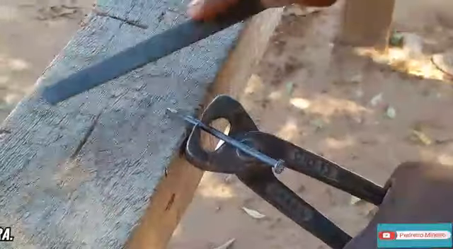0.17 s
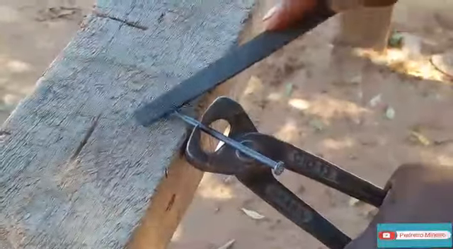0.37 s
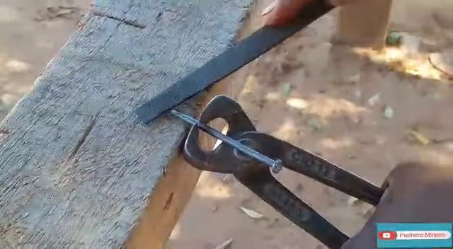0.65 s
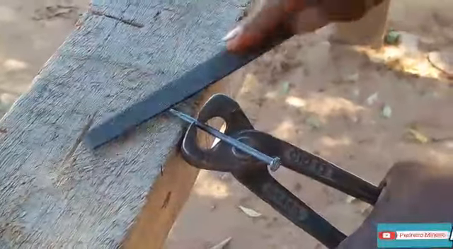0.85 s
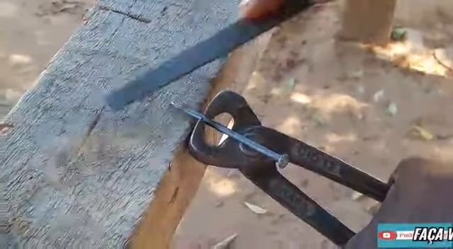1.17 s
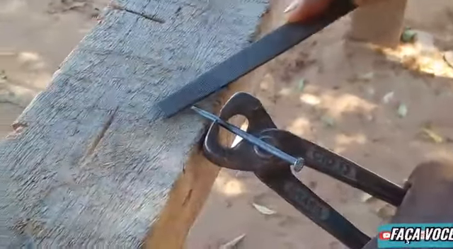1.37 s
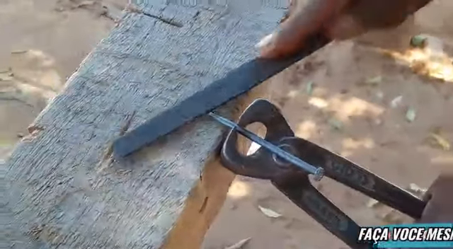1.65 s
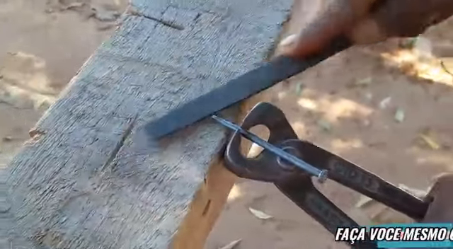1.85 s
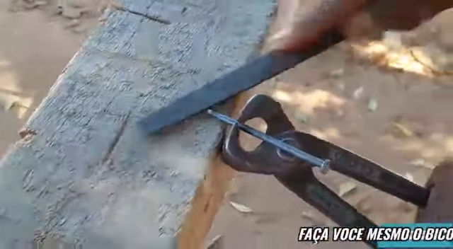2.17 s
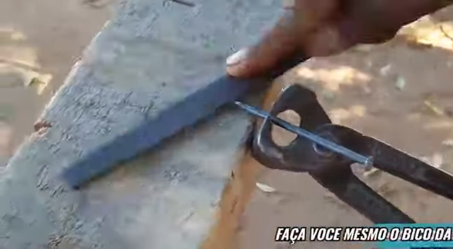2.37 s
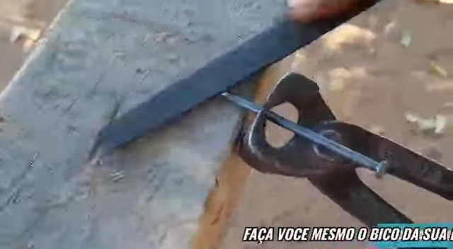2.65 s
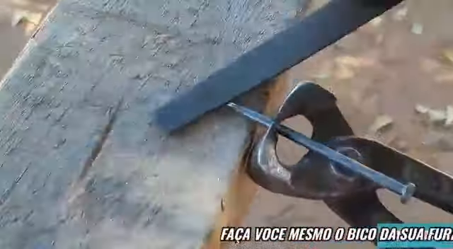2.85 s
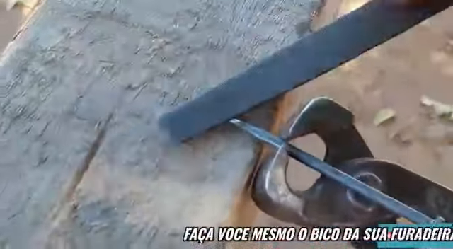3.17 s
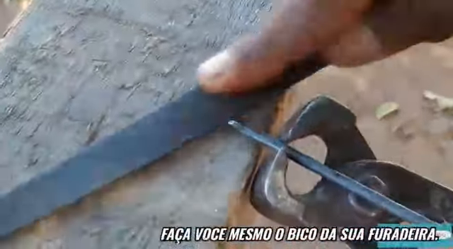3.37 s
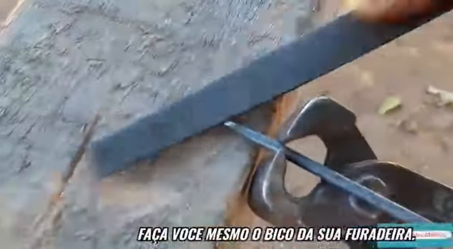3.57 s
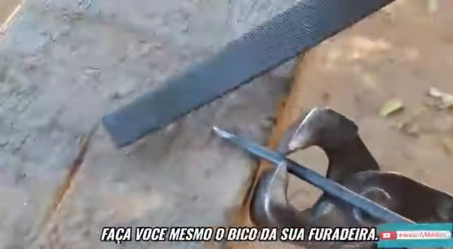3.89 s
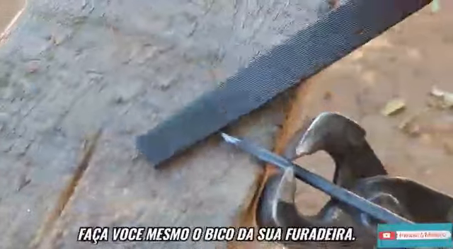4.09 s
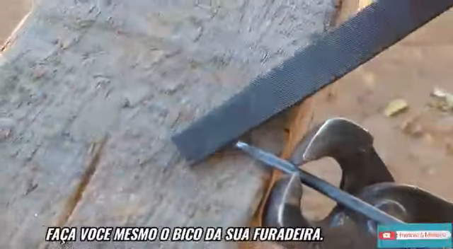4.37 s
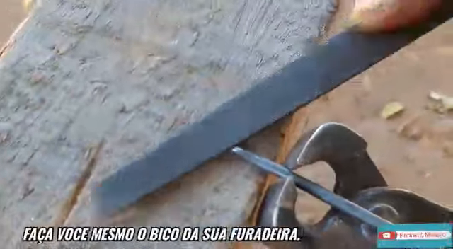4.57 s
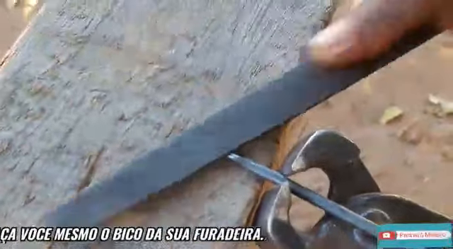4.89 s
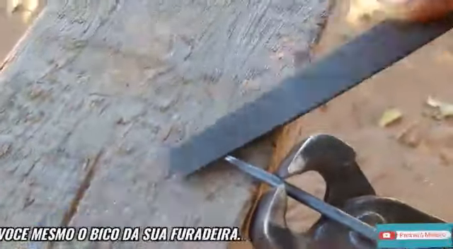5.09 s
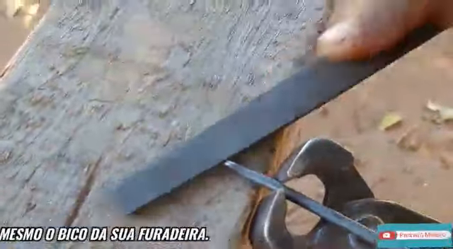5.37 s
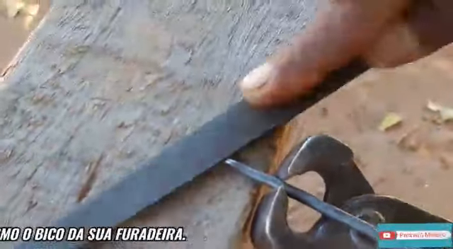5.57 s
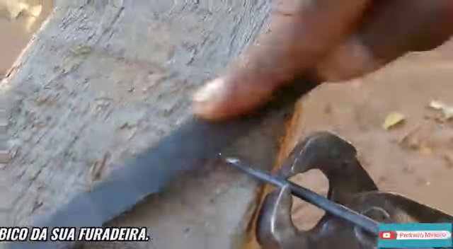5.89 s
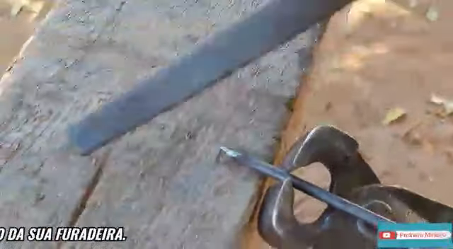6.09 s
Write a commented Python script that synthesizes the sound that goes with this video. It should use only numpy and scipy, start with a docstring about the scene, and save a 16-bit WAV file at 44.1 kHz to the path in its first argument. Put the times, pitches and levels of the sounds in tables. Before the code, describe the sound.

Outdoors, a flat steel file rasps to and fro over a nail tip gripped in pincers, in two quick runs of strokes with small taps between.

```python
"""Filing a nail at a plank

Outdoors, a flat hand file rasps to and fro over the tip of a nail held in pincers against a plank. In each
stroke the teeth pluck the nail faster, then slower, and ring pincers, blade and nail. Between the runs of
strokes come small taps, light hissing drags and low knocks of pincers on wood. Short and long echoes and a
faint outdoor murmur lie around the work; the microphone cuts a deep notch into the treble."""
import sys
import numpy as np
from scipy import signal
from scipy.fft import rfft, irfft, next_fast_len
from scipy.io import wavfile
from scipy.ndimage import map_coordinates

SR = 44100
rng = np.random.default_rng(int(sys.argv[2]) if len(sys.argv) > 2 else 0)


def pcm_store(signal):
    """Save signal as 16-bit PCM."""
    levels = np.round(np.clip(np.atleast_2d(signal), -1, 1) * 32767)
    wavfile.write(sys.argv[1], SR, levels.astype(np.int16).T)


N = 274561

# Strokes of the file, heavy and light mostly in turn: start t/s, length t/s, relative nail level/dB,
# weight (pincers over nail) level/dB, catch of the teeth after the start t/s
STROKES = [(0.08, 0.18, -36, 1.57, 0.032), (0.877, 0.15, -34.5, 1.47, 0.053),
           (1.059, 0.17, -33.5, 4.5, 0.049), (1.21, 0.17, -32, -2.5, 0.031),
           (1.392, 0.18, -31.5, 1.56, 0.051), (1.551, 0.166, -30, -4.5, 0.039),
           (1.712, 0.18, -30.5, -0.0, 0.046), (1.881, 0.16, -30.5, -5.5, 0.038),
           (2.037, 0.19, -29.5, 1.46, 0.064), (2.2, 0.17, -28.5, -5, 0.034), (2.374, 0.15, -26, -1.5, 0.05),
           (2.516, 0.171, -28.5, -6, 0.035), (2.68, 0.17, -26.5, -0.46, 0.026),
           (2.834, 0.16, -28.5, -8.5, 0.053), (3.813, 0.18, -34.5, -0.2, 0.06),
           (3.977, 0.18, -31, -1.73, 0.046), (4.148, 0.15, -29.5, -6.5, 0.018),
           (4.294, 0.18, -28, 3.5, 0.039), (4.453, 0.15, -28, -7.5, 0.038),
           (4.598, 0.18, -28.5, 3.5, 0.042), (4.757, 0.16, -28.5, -6, 0.032),
           (4.914, 0.15, -26.5, 3.5, 0.042), (5.058, 0.18, -28, -6.5, 0.031),
           (5.986, 0.16, -38, -4.5, 0.03)]
# Resonances of the pincers: nominal f/Hz, width f/Hz, level/dB in the first grip, level/dB once settled
PINCERS = [(563.2, 15, -19, -2), (648, 71, -3, -6.5), (770, 133, -14, -9), (861, 46, -4, -17.5),
           (951, 41.7, -5, -3.5), (1056.6, 57, -8, -1.5), (1234, 49, -9, -7.5), (1392, 56, -4.5, -6),
           (1525, 92, -14.5, -4.5)]


def amp(db):
    """Amplitude factor of a level in dB."""
    return 10 ** (np.asarray(db) / 20)


def rms(x):
    """Effective value of a signal."""
    return np.sqrt(np.mean(x ** 2))


def unit(x):
    """The signal at an effective value of one."""
    return x / np.sqrt(np.mean(x ** 2) + 1e-20)


def along(points, hz):
    """Value at hz on a curve of (Hz, value) points over a log axis."""
    f, value = np.transpose(points)
    return np.interp(np.log(hz + 1), np.log(f + 1), value)


def wobble(rate, size):
    """A smooth random curve with rate knots a second."""
    return map_coordinates(rng.standard_normal(4096), [np.arange(size) * rate / SR], mode="mirror")


def filtered(x, response):
    """The signal passed through a complex response of frequency."""
    n = x.shape[-1]
    m = next_fast_len(n + 4096)
    spectrum = rfft(x, m) * response(np.fft.rfftfreq(m, 1 / SR))
    return irfft(spectrum, m)[..., :n]


def add(track, s, x):
    """Mix x into the track from s seconds on."""
    start = max(round(s * SR), 0)
    track[..., start:start + x.shape[-1]] += x[..., :N - start]


def yard(floor_db=-65.5):
    """Faint outdoor air, mostly a low murmur of wind and distance: shaped noise that slowly swells."""
    # spectrum of the air: f/Hz, relative level/dB per Hz
    air = [(25, -9), (50, -9.5), (90, -1), (130, -6), (230, -4), (420, -14), (700, -11.5), (1100, -15.5),
           (4000, -21.5), (5200, -21), (6500, -35.5), (15000, -36)]
    # left-right likeness: f/Hz, correlation (1 = alike)
    likeness = [(30, 0.34), (200, 1), (4000, 0.3), (10000, .5)]

    def mid_and_side(f):
        turn = np.arccos(np.clip(along(likeness, f), -1, 1)) / 2
        return amp(along(air, f)) * [np.cos(turn), np.sin(turn)]

    mid, side = filtered(rng.standard_normal((2, N)), mid_and_side)
    return unit(np.array([mid + side, mid - side])) * amp(floor_db + 2.4 * wobble(3.3, N))


def echo(x, decay):
    """Things around scatter a noise tail, different at each ear, that fades at its own pace per pitch."""
    hz, t, z = signal.stft(rng.standard_normal((2, SR)), SR, nperseg=256)
    fade = amp(-60 * t / along(decay, hz)[:, None])
    tail = signal.istft(z * fade, SR, nperseg=256)[1]
    return signal.fftconvolve(x.mean(0)[None], tail / np.linalg.norm(tail[0]), axes=1)[:, :N]


def plank(force):
    """The pincers rattle loosely on the wood, which answers dully and without pitch."""
    # answer of the wood: f/Hz, relative level/dB per Hz
    wood = [(40, -34), (90, -20), (160, -2), (240, -1), (400, 1), (700, -7.5), (1500, -72), (3000, -28),
            (6000, -27.5), (15000, -54.5)]
    rattle = force * rng.standard_normal(len(force))
    return unit(filtered(rattle, lambda f: amp(along(wood, f)))) * rms(force)


def bumps(t60=0.049, soft_hz=380, lowest_hz=110):
    """The pincers knock on the plank: a soft contact, so only a low thud."""
    # knocks: t/s, relative level/dB
    knocks = [(0.409, -46), (0.694, -54), (1.503, -35.5), (2.985, -39.5), (5.19, -33.5)]
    force, t = np.zeros(N), np.arange(SR // 8) / SR
    for s, db in knocks:
        add(force, s, amp(db - 60 * t / t60))

    def thud_band(f):
        return (1j * f / (lowest_hz + 1j * f) / (1 + 1j * f / soft_hz)) ** 2

    return 2 * filtered(plank(force), thud_band)


def settling(s):
    """How far the grip has settled at time s, as a share from 0 to 1."""
    # grip on the pincers: t/s, share of the settled grip
    grip = [(1.2, 0), (2.5, 0.8)]
    return np.interp(s, *np.transpose(grip))


def ring(force, modes, s, vary_db=2, detune=0.0067):
    """The force rings a part, at equal energy; every contact spot weighs and tunes the modes anew."""
    settled = settling(s)
    hz, width, first_db, settled_db = np.transpose(modes)[:, :, None]
    grip_db = first_db + settled * (settled_db - first_db)
    gain = amp(grip_db + vary_db * rng.standard_normal(hz.shape))
    hz = hz * (1 + detune * rng.standard_normal(hz.shape))
    sign = (-1) ** np.arange(len(modes))[:, None]

    def resonances(f):
        each = sign * gain * 1j * f * width / (hz * hz - f * f + 1j * f * width)
        return np.sum(each, axis=0)

    return unit(filtered(force, resonances)) * rms(force)


def grit(size, clump_db, clump_rate):
    """Tiny steel chips tear off in clumps: noise with a random level."""
    return unit(rng.standard_normal(size) * amp(clump_db * wobble(clump_rate, size)))


def steel(force, s, pincers_db, blade_db, nail_db, sizzle_db=-18, plank_db=-17, spread=0.37):
    """All the parts answer one contact force; only the highest sizzle differs left and right."""
    # resonances of blade, nail and sizzle:
    # nominal f/Hz, width f/Hz, level/dB in the first grip, level/dB once settled
    blade_modes = [(1771, 45, -2.5, -2), (2085, 146, -5, -7), (2341, 190, -5.5, 0), (2578, 71, -1, 1.5),
                   (2751, 68, -1.5, 0.5), (3096, 62, 4, -2), (3448, 176, -5, -2), (3874, 200, -8.5, 2)]
    nail_modes = [(4570, 160, -6, -10), (4828, 175, 1, -7), (4739, 280, 0, -4.5), (5362, 152, -5, 4),
                  (5655, 93, -9, -1.5), (6370, 210, -22.5, -21), (6737, 72, -16, -11.5)]
    sizzle_modes = [(8560, 52, -9.5, 1), (9510, 110, 8.5, -9), (10020, 84, -0.5, -7), (10800, 94, 0.5, 6),
                    (11800, 70, -0.5, -7.5), (11880, 200, -7.5, 7), (13000, 72, 5.5, -2),
                    (12300, 44, -2.5, 3.5), (13700, 65, 1.5, -25), (14300, 44, -6.5, 2),
                    (14750, 120, -18, -1)]
    body = amp(pincers_db) * ring(force, PINCERS, s)
    body = body + amp(blade_db) * ring(force, blade_modes, s)
    body = body + amp(nail_db) * ring(force, nail_modes, s)
    body = body + amp((pincers_db + blade_db) / 2 + plank_db) * plank(force)
    mid = ring(force, sizzle_modes, s, vary_db=6.0, detune=0.011)
    rough = force * rng.standard_normal(len(force))
    side = spread * ring(rough, sizzle_modes, s, vary_db=6.0, detune=0.012)
    # the sizzle grows as the first strokes cut into fresh steel
    fresh_db = np.interp(s, [0, 1.5], [-8, 0])
    return body + amp(nail_db + sizzle_db + fresh_db) * np.array([mid + side, mid - side])


def contact(length, attack_s=0.02, release_s=0.028):
    """Envelope of a sliding contact: attack, hold, release."""
    t = np.arange(SR // 2) / SR
    return np.clip(np.minimum(t / attack_s, (length - t) / release_s), 0, 1)


def drag(flutter_db=2.0, under_stroke_db=-20):
    """With almost no pressure the teeth hiss softly over the nail and barely ring the pincers."""
    # slides without pressure: start t/s, length t/s, relative hiss level/dB, pincers ring level/dB
    slides = [(0.245, 0.11, -61.5, -66.5), (0.633, 0.15, -57, -71), (0.78, 0.31, -64, -70),
              (2.967, 0.1, -53.5, -59.5), (3.2, 0.3, -59.5, -67), (3.497, 0.074, -51.5, -55.5),
              (3.558, 0.14, -65, -61), (5.21, 0.082, -57.5, -57), (5.417, 0.07, -64.5, -84),
              (5.614, 0.12, -57, -56), (5.96, 0.22, -58.5, -58.5)]
    # hiss of the light contact: f/Hz, relative level/dB per Hz
    hiss_spectrum = [(60, -14), (200, 2.5), (450, 4.5), (650, 5.5), (1000, -2), (1450, -3), (1900, -1.5),
                     (2800, -1.5), (4200, -8.5), (5200, 2), (6300, -27), (9000, -41), (15000, -28.5)]
    level, rung = np.zeros(N), np.zeros(N)
    # the same sliding hiss goes with every stroke
    for start, length, nail_db, *_ in STROKES:
        add(level, start, amp(nail_db + under_stroke_db) * contact(length))
    for start, length, hiss_db, pincers_db in slides:
        touch = contact(length)
        add(level, start, amp(hiss_db) * touch)
        force = touch * grit(len(touch), clump_db=3.5, clump_rate=200)
        add(rung, start, amp(pincers_db) * ring(force, PINCERS, start))
    chips = grit(N, clump_db=2.5, clump_rate=600)
    hiss = unit(filtered(chips, lambda f: amp(along(hiss_spectrum, f))))
    return rung + level * amp(flutter_db * wobble(60, N)) * hiss


def taps(tap_db=-6):
    """The file lands on the nail with a short crunch, damped by the fingers."""
    # touches: t/s, relative level/dB, relative brightness level/dB, fall of the force by 60 dB t/s
    touches = [(0.315, -40, -11, 0.044), (0.410, -35, -12.5, 0.01), (0.556, -36, -5.5, 0.07),
               (0.563, -38, 1, 0.035), (0.576, -34.5, -3.5, 0.048), (0.589, -32.5, -5.5, 0.051),
               (1.074, -39.5, 2.5, .05), (1.408, -34.5, -3, 0.031), (2.059, -35, -4, .06),
               (3.249, -49.5, -2, 0.034), (3.286, -39.5, -8.5, 0.05), (3.371, -41.5, -5, .045),
               (3.388, -36, -21.5, 0.078), (3.499, -32, -12.5, 0.048), (3.546, -38, -2.5, 0.07),
               (3.641, -37.5, -16.5, 0.058), (3.823, -39.5, -19.5, 0.065), (5.861, -32, -10.5, 0.074)]
    out, t = np.zeros((2, N)), np.arange(SR // 8) / SR
    for s, db, bright_db, t60 in touches:
        force = amp(db + tap_db - 60 * t / t60) * grit(len(t), clump_db=3.5, clump_rate=810)
        crunch = steel(force, s, -1, bright_db + 4.5, bright_db - 1.5, sizzle_db=-31.5, plank_db=-19)
        add(out, s - .001, crunch)
    return out


def teeth(rate, waver, scatter_db):
    """One pluck for each tooth that passes the nail, uneven in spacing and size."""
    size = len(rate)
    passed = np.cumsum(rate * (1 + waver * wobble(300, size))) / SR
    plucks = np.diff(np.floor(passed), prepend=0) * amp(scatter_db * rng.standard_normal(size))
    # evens out the power of dense and sparse plucks
    return unit(filtered(plucks / np.sqrt(rate + 100), lambda f: f > 100))


def bites(t, length, catch_s, count=2, bite_db=2, bite_s=0.0061, catch_db=4, catch_fade_s=0.017):
    """Extra level in dB: teeth catch with a jolt that fades, and dig in at chance moments mid-stroke."""
    when, size = rng.random((2, count, 1))
    bumps_in_time = np.exp(-((t - length * (0.263 + when / 2)) / bite_s) ** 2)
    digs = np.sum(2 * size * bumps_in_time, axis=0)  # each dig peaks at 1 on average
    caught = np.clip((t - catch_s) / bite_s + .5, 0, 1)
    jolt = catch_db * np.exp(-np.abs(t - catch_s) / catch_fade_s)
    return bite_db * digs + caught * jolt


def strokes(judder_db=1.08, tone=0.56, tone_per_db=0.08, lean_db=2, plateau=0.49, force_db=-1.09, rate_power=.9):
    """The hand speeds up and slows down; speed sets both the tooth rate and the loudness."""
    # pace of the hand: t/s, tooth rate at the fastest moment f/Hz
    pace = [(0.2, 983.6), (0.95, 1019), (1.17, 902), (1.5, 1301), (1.8, 1523), (2.45, 1220), (2.8, 1241),
            (3.9, 848), (4.1, 1067), (5.0, 1102), (6.1, 1002)]
    # share of a stroke before its fastest moment; later when heavy
    crest, crest_per_db = .55, .005
    # force grows as this power of the levelled speed; steeper when heavy
    swell, swell_per_db = 2.34, .11
    # blade over nail; more when heavy, less in the settled grip
    blade_over_db, blade_per_db, grip_damps_db = 1, 0.63, 6
    slow_dull_db = 5.5  # the pincers gain up to this on the nail at low speed
    out, t = np.zeros((2, N)), np.arange(SR // 3) / SR
    for start, length, nail_db, weight_db, catch_s in STROKES:
        travel = np.interp(t / length, [0, crest + crest_per_db * weight_db, 1], [0, .5, 1])
        speed = np.abs(np.sin(np.pi * travel))
        # the cutting force levels off once the file is moving
        levelled = np.tanh(plateau * speed) / np.tanh(plateau)
        press = levelled ** (swell + swell_per_db * weight_db)
        # a heavy stroke shakes the pincers and bites tooth by tooth; a light one mostly scrapes
        share = np.clip(tone + tone_per_db * weight_db, .05, .9)
        tooth_hz = np.interp(start + length / 2, *np.transpose(pace))
        plucks = teeth(tooth_hz * speed ** rate_power, waver=.05, scatter_db=5.0)
        scrape = grit(len(t), clump_db=0.5, clump_rate=900)
        cut = np.sqrt(share) * plucks + np.sqrt(1 - share) * scrape
        uneven_db = judder_db * wobble(114.5, len(t)) + bites(t, length, catch_s)
        force = unit(cut * amp(uneven_db) * press) * rms(press) * amp(force_db)
        pincers_db = nail_db + weight_db + slow_dull_db * (1 - speed)
        blade_db = nail_db + blade_over_db + blade_per_db * weight_db - grip_damps_db * settling(start)
        # the contact spot moves along the blade, and the hand leans on the pincers more toward the end
        onward = np.clip(2 * travel - .5, 0, 1)
        near = steel(force, start, pincers_db - lean_db / 2, blade_db, nail_db)
        far = steel(force, start, pincers_db + lean_db / 2, blade_db, nail_db)
        add(out, start, (1 - onward) * near + onward * far)
    return out


def scene(near_db=-21, far_db=-28):
    """The work at the plank, a short answer from the ground, a faint long one from the yard."""
    # decay of the ground's answer, then of the yard's: f/Hz, fall by 60 dB t/s
    ground_decay = [(200, 0.99), (1000, 0.093), (5000, 0.07), (12000, 0.54)]
    yard_decay = [(200, 0.91), (1000, 0.64), (3000, 0.85), (5000, 0.56), (12000, 0.35)]
    work = strokes() + taps() + drag() + bumps()
    near = amp(near_db) * echo(work, ground_decay)
    far = amp(far_db) * echo(work, yard_decay)
    return work + near + far + yard()


def record(dry):
    """The microphone has a deep notch near 8 kHz; above it the treble comes back up to its band limit."""
    # response of the microphone: f/Hz, level/dB
    microphone = [(5700, 1.5), (6000, 10.5), (6800, -1), (7400, -3), (8100, -30.5), (8700, -3), (15500, 1)]
    top_hz = 15780
    return filtered(dry, lambda f: amp(along(microphone, f)) * (f < top_hz))


dry = scene()
out = record(dry)
pcm_store(out)
```